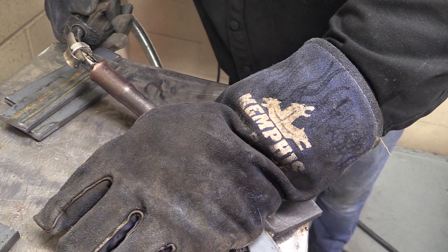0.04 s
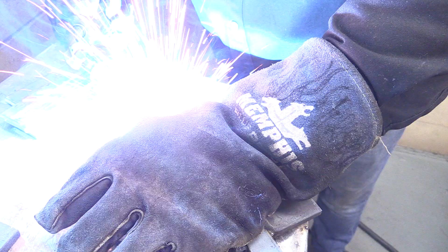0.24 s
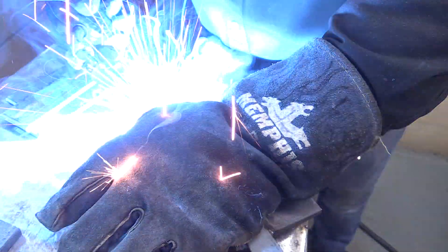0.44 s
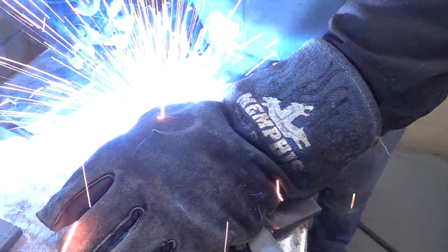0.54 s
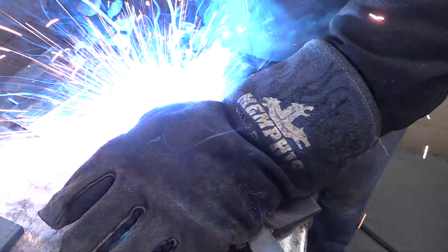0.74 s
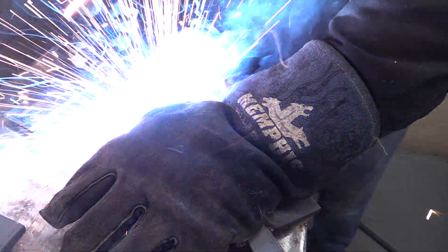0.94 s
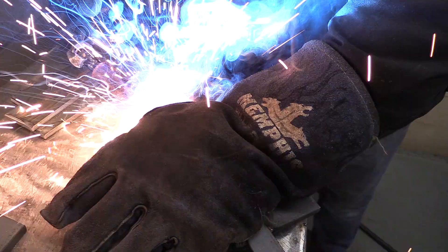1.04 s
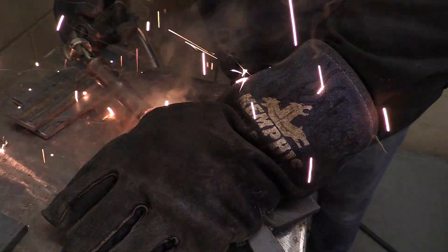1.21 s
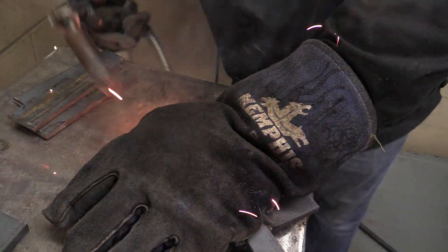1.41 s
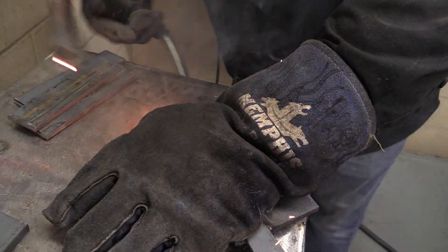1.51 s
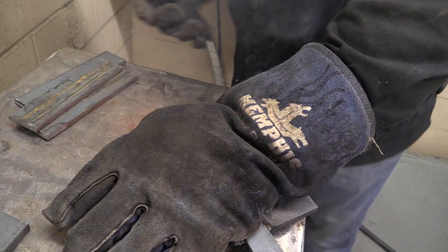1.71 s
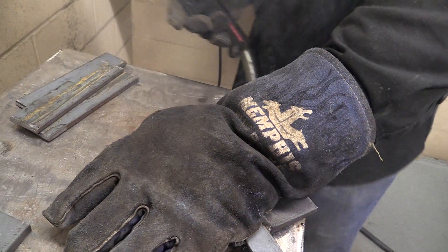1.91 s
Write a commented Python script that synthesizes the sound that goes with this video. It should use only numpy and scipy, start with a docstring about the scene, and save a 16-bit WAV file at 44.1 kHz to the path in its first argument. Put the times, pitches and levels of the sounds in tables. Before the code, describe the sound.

A welding arc, close and overloaded, in a reverberant workshop with steady low fan hum. At 0.18 s a tiny trigger chirp, at 0.2 s gas hiss and a small touch, then a bang at 0.24 s. Until 1.13 s a rough buzz of about 120 pops per second, with uneven sharp crackles and sizzle. It stops dead; the room rings briefly, gear rustles softly, and faint spatter ticks around 1.6-1.85 s.

```python
"""In a workshop, a wire-feed welding gun lays one tack on steel plate, close to the microphone.
The trigger chirps (a short sine), gas hisses (coloured noise), and the wire strikes with a bang.
The arc pops about 120 times a second (filtered impulses), sputters, sizzles and spits sharp cracks.
Bench and glove echo each pop, and the shop rings on over its fans (noise and wavering tones).
Gear rustles as the gun is lifted, and a few bits of spatter tick as they land."""
import sys
import numpy as np
from scipy import signal
from scipy.io import wavfile
from scipy.ndimage import uniform_filter1d

SR = 44100
rng = np.random.default_rng(int(sys.argv[2]) if len(sys.argv) > 2 else 0)


def store_wav(level_fs):
    """Save 16-bit WAV to argv[1]."""
    pcm = np.round(np.clip(np.atleast_2d(level_fs), -1, 1) * 32767)
    wavfile.write(sys.argv[1], SR, pcm.T.astype(np.int16))


N = 85995

ARC_ON_S, ARC_OFF_S = .255, 1.129
STRIKE_S = .2443  # moment of the bang
# colour of the arc's treble sizzle, shared by the fizz of the spits: (frequency [Hz], level [dB])
SIZZLE_COLOUR = [(200, -16), (2000, 5), (4500, 7.5), (7000, 15), (9000, 7), (11000, 6), (13500, 10.5),
                 (16000, 0)]


def amp(db):
    """Decibels to gain."""
    return 10 ** (np.asarray(db) / 20)


def unit(x):
    """Scales to rms 1."""
    return x / np.sqrt(np.mean(x ** 2) + 1e-20)


def curve(points, s):
    """Reads a curve in time."""
    return np.interp(s, *np.transpose(points))


def read(points, hz):
    """Reads a spectrum on a log-frequency axis."""
    f, value = np.transpose(points)
    return np.interp(np.log(hz + 1), np.log(f + 1), value)


def colour(x, points):
    """Causal minimum-phase filter of unit energy with the given spectrum."""
    size = 4096
    hz = abs(np.fft.fftfreq(size, 1 / SR))
    log_gain = np.log(amp(read(points, hz)))
    # the Hilbert transform of the log gain gives the phase that puts the energy first
    spectrum = np.exp(np.conj(signal.hilbert(log_gain)))
    ring = np.fft.ifft(spectrum).real[:size // 2]
    return signal.fftconvolve(x, ring / np.linalg.norm(ring))[:N]


def noise(points):
    """Steady noise of rms 1 with the given spectrum."""
    return unit(colour(rng.standard_normal(N), points))


def clicks(times, gains):
    """Single impulses at the given times."""
    samples = np.round(np.asarray(times) * SR).astype(int)
    return np.bincount(np.clip(samples, 0, N - 1), gains, N)


def fade(x, decay_s):
    """Gives each impulse an exponential decay."""
    return signal.lfilter([1], [1, -np.exp(-1 / (decay_s * SR))], x)


def puffs(x, decay_s):
    """Turns each impulse into a dying puff of noise with, on average, the same energy."""
    return fade(x, decay_s) * rng.standard_normal(N) * np.sqrt(2 / (decay_s * SR))


def snap(bursts):
    """A burst of molten metal: a sharp front and a ragged millisecond of tearing."""
    # (frequency [Hz], level [dB])
    crack_colour = [(60, -58), (400, -12), (1200, -16), (1900, -3.5), (2400, 0.5), (3300, 4.5), (4000, -9),
                    (4800, -3.5), (6500, -16.5), (10000, -17.5), (15000, -33.5)]
    tear = puffs(bursts, decay_s=.001)
    return colour(amp(-6) * bursts + amp(-1) * tear, crack_colour)


def arc():
    """Each cycle the wire shorts with a pop and a crack, then the arc relights; sputter and sizzle flare."""
    # cycle rate: (time [s], pops per second)
    pop_rate = [(.255, 125.4), (.29, 140.6), (.38, 133.7), (.43, 117.2), (.63, 114.3), (.73, 122.7),
                (.8, 106.6), (.875, 127.5), (.95, 116.9), (1.0, 126.2), (1.13, 116.5)]
    # levels of pops, crackle and treble sizzle: (time [s], level [dB])
    pop_level = [(.27, 0.5), (.38, 2.5), (.52, 7.5), (.64, 5.5), (.73, 10.5), (.77, 6.5), (.85, 7.5),
                 (1.04, 9.5), (1.12, 8)]
    crackle_level = [(.26, -36), (.4, 1.5), (.49, -1.5), (.545, 17), (.57, -2), (.615, 25.5), (.645, 6.5),
                     (.7, 14.5), (.742, 12), (.756, -10), (.8, 14), (.845, 13.5), (.885, 0), (.912, 14),
                     (.965, 5), (1.01, 9), (1.075, 10), (1.095, -11)]
    sizzle_level = [(.26, -33), (.33, -29), (.4, -34), (.5, -36), (.6, -20.5), (.735, -24.5), (.765, -30.5),
                    (.83, -18), (.89, -35), (1.0, -21), (1.125, -31)]
    # colours of the pops and of the sputter after each: (frequency [Hz], level [dB])
    pop_colour = [(30, -29), (75, -19.5), (130, -10), (180, 0.5), (255, 7), (330, -6), (480, -1), (580, 6),
                  (850, 2), (1080, -2.5), (1260, 0.5), (1650, -5.5), (2300, -3), (3300, -8.5), (4200, -30),
                  (8000, -15), (15000, -35)]
    sputter_colour = [(60, -27.5), (200, -11), (420, 2.5), (620, 1), (900, 6.5), (1080, -6), (1700, 1.5),
                      (3300, -10.5), (5000, -8.5), (15000, -17)]
    pop_spread_db, crack_spread_db = 1.4, 1.3
    jitter_s, crack_lag_s = .00007, .00015
    reignite_s, reignite_spread_s, reignite_db = .002345, .00012, -3
    sputter_db, sputter_s = -6.5, .0049

    # one short at each whole cycle, with small random differences
    t = np.arange(N) / SR
    cycles = np.cumsum(curve(pop_rate, t) * (t > ARC_ON_S) * (t < ARC_OFF_S)) / SR
    at = t[1:][np.diff(np.floor(cycles)) > 0]
    jitter, size, relight, lag, crack, fizz = rng.standard_normal((len(at), 6)).T
    at = at + jitter_s * jitter
    relit = at + reignite_s + reignite_spread_s * relight

    strength = amp(curve(pop_level, at) + pop_spread_db * size)
    pops = clicks(at, strength) + clicks(relit, strength * amp(reignite_db))
    sputter = amp(sputter_db) * colour(puffs(pops, sputter_s), sputter_colour)

    crack_gain = amp(curve(crackle_level, at) + crack_spread_db * crack)
    cracks = clicks(at + crack_lag_s * abs(lag), crack_gain)

    # sizzle: a low steady bed while the arc burns, flaring at each short and relight
    burning = np.clip(np.minimum(t - ARC_ON_S, ARC_OFF_S - t) / .004, 0, 1)
    short_sparks = clicks(at, amp(2 * crack_spread_db * crack))
    relit_sparks = clicks(relit, amp(-4 + 2 * crack_spread_db * fizz))
    flare = .15 * burning + 2 * fade(short_sparks + relit_sparks, decay_s=.0016)
    sizzle = noise(SIZZLE_COLOUR) * flare * amp(curve(sizzle_level, t))
    return colour(pops, pop_colour) + sputter + snap(cracks) + sizzle


def spits():
    """Drops of molten wire burst: a loud snap with a short fizz."""
    # (time [s], level [dB])
    spit_events = [(.2622, 18), (.2701, 17), (.2728, 12), (.2803, 9), (.2875, 8), (.2955, 8), (.3088, 9.5),
                   (.3229, 7.5), (.33, 4), (.3374, 6), (.3446, 12.5), (.347, 9), (.3674, 6), (.392, 3),
                   (.4308, 8), (.4648, 6), (.4812, 5), (.4984, 6), (.5502, 12), (.5837, 10), (.669, 15),
                   (.7117, 13), (.7365, 15)]
    at, db = np.transpose(spit_events)
    bursts = clicks(at, amp(db))
    fizz = colour(puffs(bursts, decay_s=.0014), SIZZLE_COLOUR)
    return snap(bursts) + amp(-3) * fizz


def strikes():
    """A first touch of the wire, then the bang that lights the arc: an impulse with a puff of blast."""
    # colours of the touch and of the bang: (frequency [Hz], level [dB])
    touch_colour = [(60, -26), (400, -7), (900, 2), (1600, -6), (3000, -18), (15000, -36)]
    bang_colour = [(20, -16), (60, -12), (150, -10), (300, -6), (470, 3), (620, -3), (1000, -4), (2400, 0),
                   (4000, -6), (8000, -14), (15000, -23)]
    touch_s, touch_db, strike_db = .2116, 0, 24
    touch = clicks([touch_s], [amp(touch_db)])
    bang = clicks([STRIKE_S], [amp(strike_db)])
    blast = amp(-5) * puffs(bang, decay_s=.002)
    return colour(touch, touch_colour) + colour(bang + blast, bang_colour)


def gun():
    """A short sine chirp at the trigger, then hissing gas, strongest before the strike, until the arc stops."""
    # (frequency [Hz], level [dB])
    gas_colour = [(100, -28), (500, -3), (900, 2), (1700, 1.5), (3200, -3.5), (4200, -12), (7000, -8.5),
                  (13000, -12), (16000, -14)]
    chirp_s, chirp_length_s, chirp_hz, chirp_db = .1835, .018, 2530, -36
    gas_on_s, gas_attack_s, gas_release_s = .202, .002, .0067
    t = np.arange(N) / SR
    chirp_shape = np.clip(np.minimum(t - chirp_s, chirp_s + chirp_length_s - t) / .0013, 0, 1)
    chirp = amp(chirp_db) * chirp_shape * np.sin(2 * np.pi * chirp_hz * t)
    flow = np.clip(np.minimum((t - gas_on_s) / gas_attack_s, (ARC_OFF_S - t) / gas_release_s), 0, 1)
    gas_level_db = np.where(t > STRIKE_S, -33.5, -28.5)
    return chirp + amp(gas_level_db) * flow * noise(gas_colour)


def aftermath():
    """Soft noise rustle as the gun is lifted, and a few ticking noise puffs of landing spatter."""
    # level of the rustle: (time [s], level [dB])
    rustle_level = [(1.12, -63), (1.25, -40), (1.45, -42.5), (1.6, -43.5), (1.75, -45), (1.95, -46)]
    # spatter landing: (time [s], level [dB])
    tick_events = [(1.604, -20), (1.614, -29), (1.668, -27), (1.716, -25), (1.854, -28)]
    # colours of the rustle and of the ticks: (frequency [Hz], level [dB])
    rustle_colour = [(300, -16.5), (1500, 10), (3000, 1.5), (5000, -7), (9000, -9), (11500, -23),
                     (16000, -43)]
    tick_colour = [(500, -22.5), (3500, 2), (5200, 0), (7000, 0), (10000, -3), (15000, -21)]
    t = np.arange(N) / SR
    at, db = np.transpose(tick_events)
    rustle = noise(rustle_colour) * amp(curve(rustle_level, t)) * (t > ARC_OFF_S)
    ticks = colour(puffs(clicks(at, amp(db)), decay_s=.0018), tick_colour)
    return rustle + ticks


def tail(t60_points, delay_s):
    """Reverberation of unit energy: a second of noise, each band dying at its own speed."""
    hz, t, z = signal.stft(rng.standard_normal(SR), SR, nperseg=256)
    decay = amp(-60 * t / read(t60_points, hz)[:, None])
    ring = signal.istft(z * decay, SR, nperseg=256)[1]
    return np.r_[np.zeros(int(delay_s * SR)), ring / np.linalg.norm(ring)]


def shop(x):
    """Near echoes, then the long ring of the room."""
    # near reflections from bench, glove and body: (delay [s], gain)
    near_echoes = [(.00118, 0.12), (.0025, 0.34), (.0037, 0.088)]
    # time for the ring to fall 60 dB: (frequency [Hz], time [s])
    ring_t60 = [(100, 0.35), (500, 0.42), (1500, 0.35), (4000, 0.44), (8000, 0.36), (12000, 0.17)]
    # colour of the ring: (frequency [Hz], level [dB])
    ring_colour = [(60, -2), (300, -3), (800, -2), (1700, 0), (2600, -7), (8000, -3), (11500, 0.5),
                   (15000, -23)]
    delay, gain = np.transpose(near_echoes)
    near = x + signal.fftconvolve(x, clicks(delay, gain))[:N]
    ring = signal.fftconvolve(colour(near, ring_colour), tail(ring_t60, delay_s=.005))[:N]
    return near + amp(-14) * ring


def fans():
    """Ventilation: a steady rush of noise, with tones whose phase wavers slowly at random."""
    # colour of the rush: (frequency [Hz], level [dB])
    fan_colour = [(20, -8), (60, -15.5), (120, -11.5), (190, -20), (250, 1.5), (295, -13.5), (345, -4.5),
                  (470, -6), (570, -10), (780, -2.5), (1030, -8), (2000, -19), (4000, -31), (15500, -39)]
    # fan tones: (frequency [Hz], rms level [dB])
    fan_tones = [(250, -63), (334, -54), (446, -52), (480, -55), (1001, -52.5)]
    t = np.arange(N) / SR
    out = amp(-42.5) * noise(fan_colour)
    for hz, db in fan_tones:
        smoothed = uniform_filter1d(rng.standard_normal(N), size=3000)
        waver = unit(uniform_filter1d(smoothed, size=3000))  # radians
        out += amp(db) * np.sqrt(2) * np.sin(2 * np.pi * hz * t + waver)
    return out


def scene():
    """The weld ringing in its room, with the aftermath and the fans added dry."""
    weld = arc() + spits() + strikes() + gun()
    return (shop(weld) + aftermath() + fans())[None]


def record(dry):
    """The input overloads, gain control turns down and slowly recovers, then the band limit."""
    clipped = signal.lfilter(*signal.butter(1, 40, "high", fs=SR), np.clip(dry[0], -1, 1))
    power = signal.lfilter(*signal.butter(1, 12, fs=SR), clipped ** 2)
    level_db = 10 * np.log10(power + 1e-12)
    # the highest level so far is held, sinking .83 dB a second
    sink_db = np.arange(N) / SR * .83
    held_db = np.maximum.accumulate(level_db + sink_db) - sink_db
    over_db = np.maximum(held_db + 19, 0)  # excess above -19 dB
    duck_db = signal.lfilter(*signal.butter(1, 4, fs=SR), .3 * over_db)
    low_pass = signal.firwin(511, 15800, window=("kaiser", 7), fs=SR)  # cutoff in Hz
    return signal.fftconvolve(clipped * amp(-duck_db), low_pass, "same")[None]


dry = scene()
out = record(dry)
store_wav(out)
```